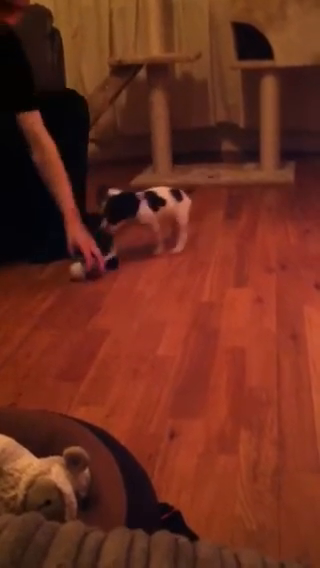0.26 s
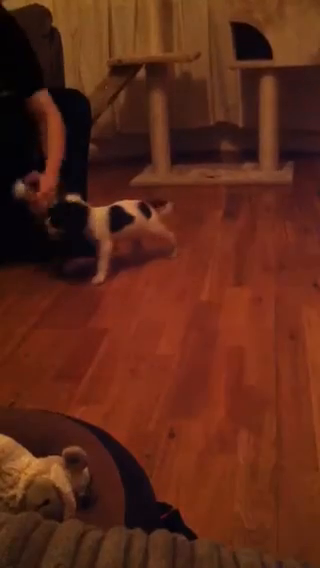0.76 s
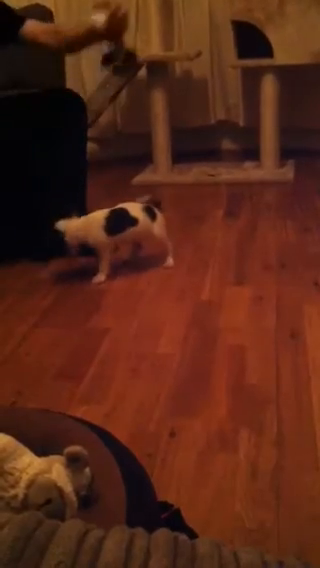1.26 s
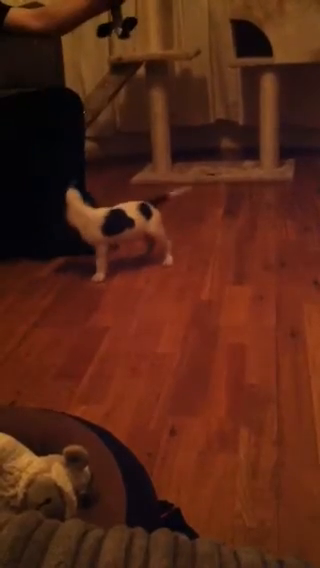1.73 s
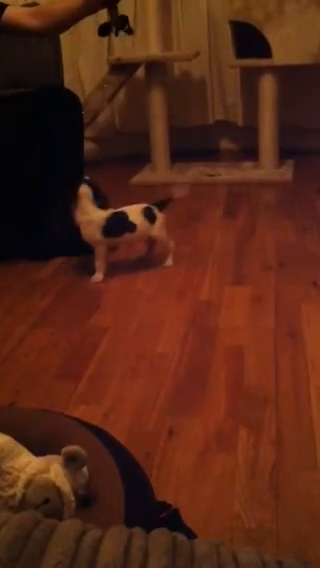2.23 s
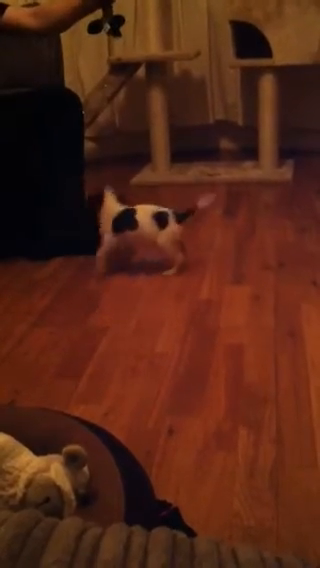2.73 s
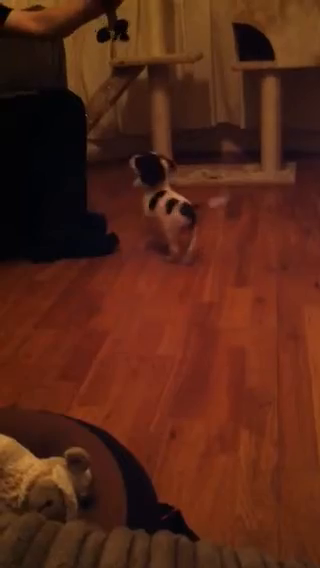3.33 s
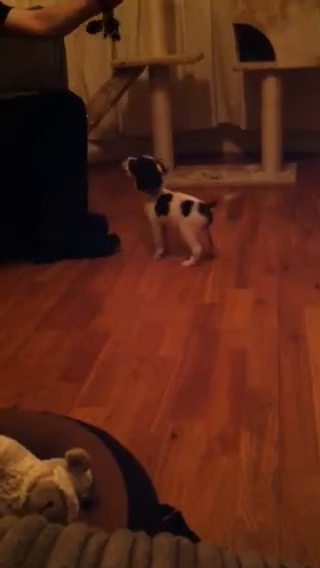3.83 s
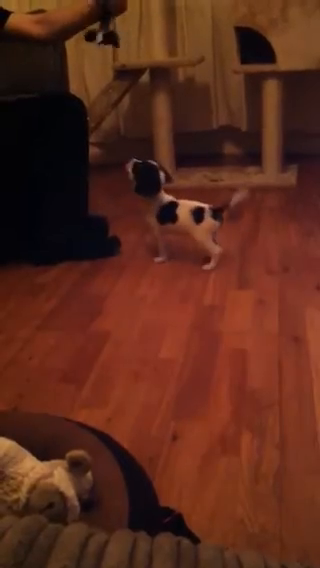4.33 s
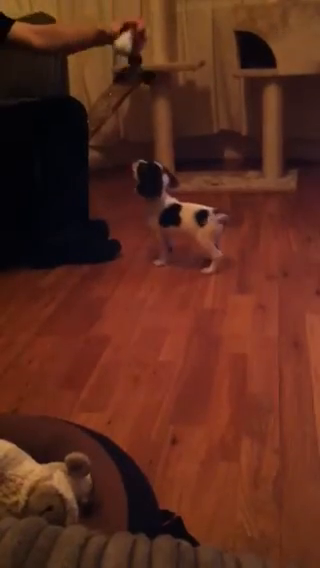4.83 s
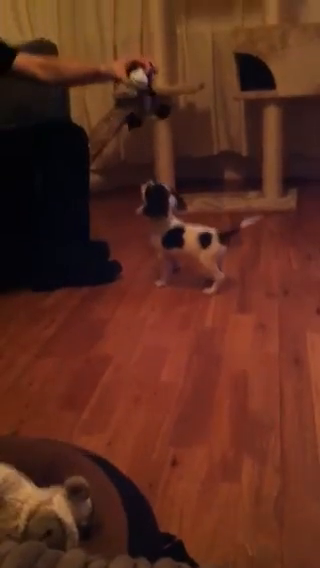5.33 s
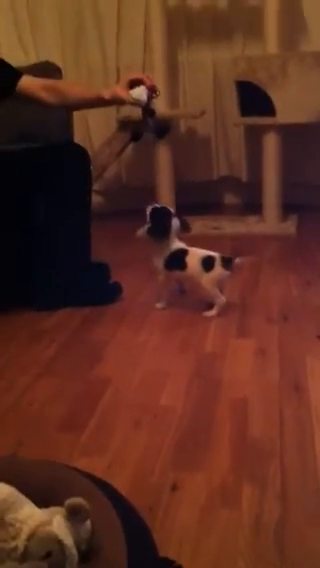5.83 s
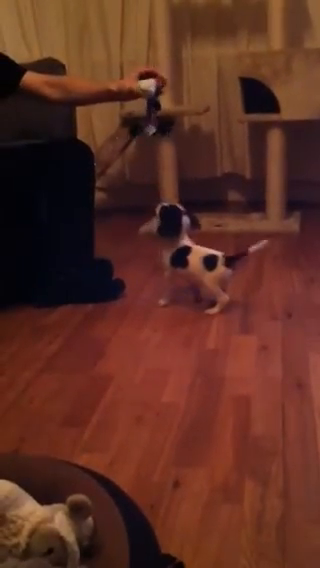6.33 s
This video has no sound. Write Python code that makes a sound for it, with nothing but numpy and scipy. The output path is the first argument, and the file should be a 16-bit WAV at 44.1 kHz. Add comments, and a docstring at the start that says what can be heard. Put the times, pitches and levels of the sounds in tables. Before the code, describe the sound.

A rubber toy is squeezed six times indoors, giving short bright squeaks with softer refill peeps and pops, after faint puppy paw scuffs and whimpers.

```python
"""Mains hum, a picture tube's line whine and microphone hiss run throughout, in a living room with a hard floor.
A puppy's paws scuff the floor in short noise bursts, and it whimpers faintly in narrow bands of noise.
A rubber toy with a reed squeaker is squeezed six times: a loud rising squeak of summed harmonics as air
is pushed out, a softer flat one as it refills, and a pop of decaying body modes as the wall springs back."""
import sys
import numpy as np
from scipy import signal
from scipy.fft import rfft, irfft
from scipy.io import wavfile
from scipy.ndimage import uniform_filter1d

SR = 44100
rng = np.random.default_rng(int(sys.argv[2]) if len(sys.argv) > 2 else 0)


def output_pcm(signal):
    """Save a mono or channel-first signal as 16-bit PCM at the path in sys.argv[1].

    Samples are clipped to [-1, 1] before scaling.
    """
    pcm = np.clip(np.atleast_2d(signal).T, -1, 1) * 32767
    wavfile.write(sys.argv[1], SR, np.round(pcm).astype(np.int16))


N = 290619  # length [samples]
EDGE_HZ = 16100  # upper band limit, of the reed's harmonics and of the microphone


def gain_of(db):
    """Decibels to amplitude gain."""
    return 10 ** (np.asarray(db) / 20)


def evened(x):
    """Scales to rms 1."""
    return x / np.sqrt(np.mean(x ** 2) + 1e-20)


def read(points, hz):
    """Interpolates (frequency, value) points on a log-frequency axis."""
    f, value = np.transpose(points)
    return np.interp(np.log(hz + 1), np.log(f + 1), value)


def add(mix, start, sound):
    """Mixes a sound in at a start time in seconds, cut at the end of the mix."""
    part = mix[round(start * SR):][:len(sound)]
    part += sound[:len(part)]


def noise(size, colour):
    """Random noise of rms 1, its spectrum shaped by (frequency [Hz], level [dB]) points."""
    spectrum = rfft(rng.standard_normal(size))
    spectrum *= gain_of(read(colour, np.fft.rfftfreq(size, 1 / SR)))
    return evened(irfft(spectrum, size))


def wander():
    """A slow random drift of rms 1: white noise smoothed twice."""
    once = uniform_filter1d(rng.standard_normal(N), 3000)
    return evened(uniform_filter1d(once, 3000))


# Colour of the microphone hiss: (frequency [Hz], relative level [dB per Hz])
HISS_COLOUR = [(20, -16), (45, -25), (70, -22.5), (110, -12), (230, -11.5), (380, -19), (700, -22),
               (1130, -20.5), (2300, -25.5), (7000, -29.5), (14000, -31.5), (16500, -29.5)]
HISS_DB = -68.5  # rms level, ahead of the microphone's filters


def hiss():
    """Steady microphone noise with a fixed colour."""
    return gain_of(HISS_DB) * noise(N, HISS_COLOUR)


# Mains hum components: (multiple of the mains frequency, mean rms level [dB])
HUM_PARTS = [(2, -86), (3, -73.5), (4, -80.5), (7, -89), (8, -89), (11, -95.5), (12, -93), (14, -81.5),
             (17, -88), (22.5, -88)]
MAINS_HZ = 50.05


def mains_hum():
    """Multiples of the mains frequency, each drifting in level and phase on its own."""
    t = np.arange(N) / SR
    hum = np.zeros(N)
    for multiple, db in HUM_PARTS:
        level = gain_of(db + 1.36 * wander())
        turns = multiple * MAINS_HZ * t + 0.059 * wander()
        hum += level * np.cos(2 * np.pi * turns)
    return np.sqrt(2) * hum  # peak level to rms level


# Line whine at the microphone, shaded by moving bodies: (time [s], rms level of the carrier [dB])
WHINE_LEVELS = [(0.0, -56.5), (0.3, -56.5), (1.06, -55), (3.3, -55), (5.15, -57.5), (5.36, -59),
                (5.47, -67.5), (5.84, -65), (6.11, -72.5), (6.59, -71)]
# Field-rate sidebands of the whine: (offset [Hz], level against the carrier [dB])
WHINE_SIDEBANDS = [(-100, -31), (-52, -20.5), (54, -26.5), (98.5, -29)]
WHINE_HZ = 15625.2


def line_whine():
    """The picture tube's line-rate tone with field-rate sidebands; moving bodies shade it."""
    t = np.arange(N) / SR
    carrier = (0.03, 0.013)  # offset [Hz], level [dB]
    whine = np.zeros(N)
    for offset, db in [carrier] + WHINE_SIDEBANDS:
        whine += gain_of(db) * np.cos(2 * np.pi * (WHINE_HZ + offset) * t)
    shading_db = np.interp(t, *np.transpose(WHINE_LEVELS)) + 0.5 * wander()
    return np.sqrt(2) * whine * gain_of(shading_db)


# How long the living room rings: (frequency [Hz], t60 [s])
ROOM_DECAY = [(300, 0.23), (1200, 0.24), (2600, 0.21), (7000, 0.19), (14000, 0.17)]


def room(x, wet_db):
    """Direct sound, a floor bounce and a sparse tail that dies band by band; new taps on every call."""
    taps = np.zeros(SR // 2)
    slots = np.arange(100, SR // 2 - 20, 20)
    # one reflection of random sign somewhere in each slot
    taps[slots + rng.integers(0, 20, len(slots))] = rng.choice([-1., 1.], len(slots))
    hz, t, bands = signal.stft(taps, SR, nperseg=128)
    decay = gain_of(-60 * t / read(ROOM_DECAY, hz)[:, None])
    response = signal.istft(bands * decay, SR, nperseg=128)[1]
    response *= 1 - np.exp(-np.arange(len(response)) / SR / 0.00067)  # reflections build up
    response *= gain_of(wet_db) / np.linalg.norm(response)  # tail energy against the direct sound
    response[0] += 1
    response[round(0.0031 * SR)] += 0.35  # floor bounce, about a metre farther to the microphone
    return signal.fftconvolve(x, response)


# Paw scuffs on the hard floor: (time of the peak [s], level [dB], rise [s], brightest frequency [Hz])
PAW_SCUFFS = [(0.059, -65.5, .001, 2200), (.068, -62, .002, 6760), (0.278, -67, 0.01, 7000),
              (0.448, -58, 0.0013, 3470), (.459, -56, 0.0013, 5450), (.633, -61.5, 0.013, 6440),
              (1.158, -63.5, 0.0012, 2580), (2.82, -64.5, 0.0018, 2800), (2.835, -66, 0.0055, 6100)]
SCUFF_DECAY_S = 0.0061


def scuff(db, rise, top_hz):
    """A pad or claw grazing the floor: a short broad burst of noise, peaking 3 rises after its start."""
    t = np.arange(round((3 * rise + 5 * SCUFF_DECAY_S) * SR)) / SR - 3 * rise
    shape = np.where(t < 0, np.exp(-(t / rise) ** 2), np.exp(-t / SCUFF_DECAY_S))
    colour = [(0.1 * top_hz, -24), (0.37 * top_hz, -6), (top_hz, 0), (1.7 * top_hz, -6), (16000, -12)]
    return gain_of(db) * shape * noise(len(t), colour)


# Faint airy whimpers: (time [s], length [s], level [dB], pitch [Hz],
#                       octave against the pitch [dB], breath between them against the pitch [dB])
PUPPY_WHIMPERS = [(0.485, 0.15, -74.5, 1830, 0, 4), (0.806, .1, -85, 2400, -1, -4),
                  (1.17, 0.061, -90, 2200, 9, -7), (1.318, 0.11, -84, 1850, 5.5, -9),
                  (1.474, 0.093, -81, 1670, 2.5, -14), (2.745, 0.027, -71.5, 1590, -11, -4)]


def whimper(length, db, hz, octave_db, breath_db):
    """A fuzzy whistle with its octave and a band of air between, fading along its length."""
    size = round(length * SR)
    progress = np.arange(size) / size

    def band(centre, share):
        """Noise peaking at the centre, 30 dB down a share of it away."""
        return noise(size, [(centre * (1 - share), -30), (centre, 0), (centre * (1 + share), -30)])

    whistle = band(hz, 0.2) + gain_of(octave_db) * band(2 * hz, 0.2)
    breath = gain_of(breath_db) * band(1.5 * hz, 0.88)
    breath *= np.exp(-((progress - 0.4) / 0.37) ** 2)
    shape = signal.windows.tukey(size, 0.3) * np.exp(-progress * 0.82)
    return gain_of(db) * (whistle + breath) * shape


def reed(hold, first_hz, top_hz, rise, bright_db, flutter, onset_db, slack_hz, sag, release,
         dull_db, air_db, levels):
    """Pitch climbs with the pressure, holds, then sags to the slack pitch as the tone fades; air hisses through."""
    t = np.arange(round((hold + 4 * release) * SR)) / SR
    after = np.maximum(t - hold, 0)
    hz = top_hz - (top_hz - first_hz) * np.exp(-t / rise)
    hz += (slack_hz - hz) * np.clip(after / sag, 0, 1) ** 2
    hz *= 1 + flutter * evened(uniform_filter1d(rng.standard_normal(len(t)), 120))
    turns = np.cumsum(hz) / SR

    tilt_db = bright_db + dull_db * np.exp(-t / 0.0063)  # overtones grow once the reed swings fully
    tone = np.zeros(len(t))
    for k in range(1, 13):
        level = gain_of(levels(k, k * hz) + tilt_db * np.log2(k)) * (k * hz < EDGE_HZ)
        # the rubber body delays each overtone differently, which blunts the spike of the wave
        tone += level * np.cos(2 * np.pi * (k * turns + k * k / 40))

    air = noise(len(t), [(800, -42), (2300, -15), (4000, -14), (9000, 0.0), (15000, -20)])
    air *= 1 - np.exp(-t / 0.0042)
    shape = 1 - np.exp(-t / 0.00078)
    shape *= gain_of(onset_db * np.exp(-t / 0.002))
    shape *= np.exp(-(after / release) ** 2)
    return (evened(tone) + gain_of(air_db) * air) * shape


# Squeezes of the toy: (time [s], time at pressure [s], level [dB], top pitch [Hz], pitch rise time [s])
TOY_SQUEEZES = [(2.252, 0.018, -32.5, 1451, 0.0035), (3.404, 0.017, -30, 1578, 0.0071),
                (3.692, 0.021, -29.5, 1557, 0.0048), (3.973, 0.019, -29, 1747, 0.007),
                (4.233, 0.023, -29.5, 1689, 0.0026), (6.033, 0.017, -31.5, 1484, 0.0056)]
# Harmonic levels of the reed blown outward, before tilt: (frequency [Hz], relative level [dB])
BLOWN_LEVELS = [(760, -53), (1300, -0.5), (3110, -3), (6220, -4), (9420, -1), (13400, -11), (14100, -19.5),
                (15500, -27)]
BLOWN_START_HZ, SLACK_HZ = 1378, 1242  # first pitch, pitch as the pressure dies
BLOWN_BRIGHT_DB, BLOWN_FLUTTER = 0.42, 0.008  # tilt [dB per octave], rms pitch flutter [share]
BLOWN_AIR_DB = -14  # air against the tone


def squeeze(hold, db, top_hz, rise):
    """Air forced out through the reed: loud, bright, with a falling end."""
    return gain_of(db) * reed(
        hold, BLOWN_START_HZ, top_hz, rise, BLOWN_BRIGHT_DB, BLOWN_FLUTTER, onset_db=-1.0,
        slack_hz=SLACK_HZ, sag=0.012, release=0.013, dull_db=-3.5, air_db=BLOWN_AIR_DB,
        levels=lambda k, hz: read(BLOWN_LEVELS, hz))


# Refills of the toy: (time [s], time until the wall springs back [s], level [dB], pitch [Hz],
#                      brightness [dB per octave], rms pitch flutter [share], pop peak [dB])
TOY_REFILLS = [(2.439, 0.032, -42.5, 1286, -0.1, .0045, -28), (3.582, 0.041, -41, 1295, 0.3, 0.0038, -30),
               (3.862, 0.041, -40, 1297, 0.9, 0.0058, -30), (4.122, 0.044, -40, 1297, 0.3, 0.0068, -28.5),
               (4.414, .046, -42, 1283, -0.3, 0.0048, -27), (6.229, 0.027, -41, 1279, 2.5, 0.016, -30.5)]
# Harmonic levels of the reed drawn inward, before tilt: (harmonic number, relative level [dB])
DRAWN_LEVELS = [(1, -1), (2, 1), (3, -4), (4, -4.5), (5, -7.5), (6, -26), (7, -4.5), (8, -1), (9, -4.5),
                (10, -3), (11, -14), (12, -20)]
DRAWN_START_HZ, STALL_HZ = 1060, 1176  # first pitch, pitch as the pressure dies
DRAWN_RISE_S, STALL_LEAD_S = 0.00178, 0.0052  # pitch rise time; the flow falters this long before the pop


def refill(hold, db, hz, bright_db, flutter):
    """Air drawn in through the reed: steady, with the sixth harmonic almost missing."""
    return gain_of(db) * reed(
        hold, DRAWN_START_HZ, hz, DRAWN_RISE_S, bright_db, flutter, onset_db=-0.32,
        slack_hz=STALL_HZ, sag=0.0075, release=0.0054, dull_db=-3.5, air_db=-27,
        levels=lambda k, hz: DRAWN_LEVELS[k - 1][1])


# Modes of the hollow rubber body: (frequency [Hz], relative level [dB], t60 [s])
BODY_MODES = [(235, -22.5, 0.054), (482, -19, 0.011), (850, -9.5, 0.022), (1415, 5, 0.016),
              (1796, -8.5, 0.0099), (2830, 2.5, 0.012), (4290, -6, 0.012)]
# Colour of the last rush of air: (frequency [Hz], relative level [dB])
GASP_COLOUR = [(500, -18), (1500, -1), (4000, -16.5), (6800, -6), (8000, -22), (9300, -1.5), (12000, -1.5),
               (14500, -10.5)]
GASP_DB = -14  # last rush of air, against the pop's peak
POP_RISE_S = 0.0003


def pop(pop_db, gasp_db):
    """The wall springs back: one blow rings the hollow body, and the last air rushes in."""
    t = np.arange(round(0.053 * SR)) / SR
    blow = np.zeros(len(t))
    for hz, db, t60 in BODY_MODES:
        blow += gain_of(db - 60 * t / t60) * np.sin(2 * np.pi * hz * t)
    blow *= 1 - np.exp(-t / POP_RISE_S)  # soft rubber: the blow takes a moment
    too_small_for_bass = signal.butter(3, 190, "high", fs=SR, output="sos")
    blow = signal.sosfilt(too_small_for_bass, blow)
    gasp = noise(len(t), GASP_COLOUR) * np.exp(-((t - 0.009) / 0.0058) ** 2)
    return gain_of(pop_db) * blow / abs(blow).max() + gain_of(gasp_db) * gasp


def scene():
    """Places every source in the room, over the hiss, hum and whine."""
    mix = hiss() + mains_hum() + line_whine()
    for peak, db, rise, top_hz in PAW_SCUFFS:
        add(mix, peak - 3 * rise, room(scuff(db, rise, top_hz), wet_db=0.0))
    for start, *settings in PUPPY_WHIMPERS:
        add(mix, start, room(whimper(*settings), wet_db=4.5))
    for start, *settings in TOY_SQUEEZES:
        add(mix, start, room(squeeze(*settings), wet_db=2.5))
    for start, until, *settings, pop_db in TOY_REFILLS:
        add(mix, start, room(refill(until - STALL_LEAD_S, *settings), wet_db=3.5))
        add(mix, start + until, room(pop(pop_db, pop_db + GASP_DB), wet_db=3.0))
    return mix[None]


def record(dry):
    """The microphone's bass roll-off and the upper band limit."""
    bass_cut = signal.butter(2, 60, "high", fs=SR, output="sos")
    thin = signal.sosfilt(bass_cut, dry)
    band_limit = signal.firwin(1023, EDGE_HZ, window=("kaiser", 13), fs=SR)
    return signal.oaconvolve(thin, band_limit[None], "same")


dry = scene()
out = record(dry)
output_pcm(out)
```